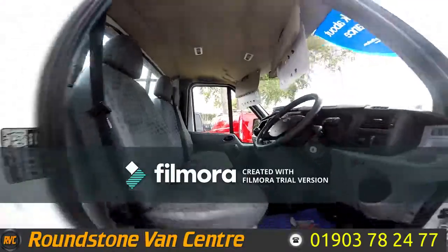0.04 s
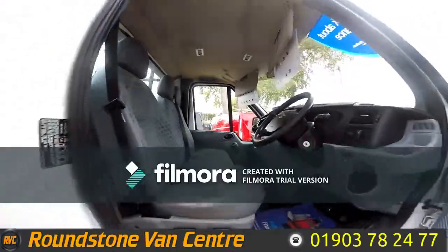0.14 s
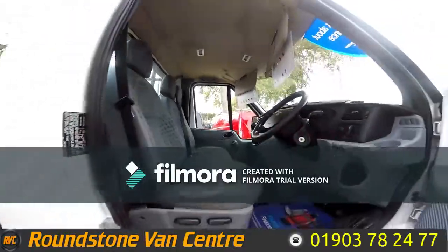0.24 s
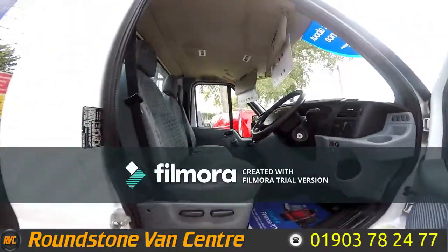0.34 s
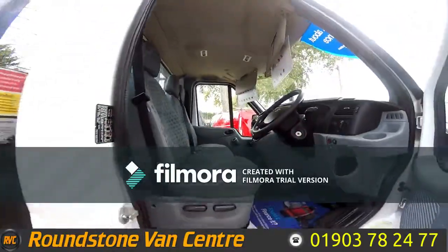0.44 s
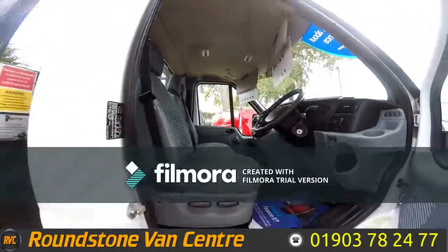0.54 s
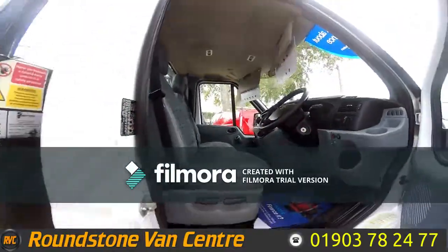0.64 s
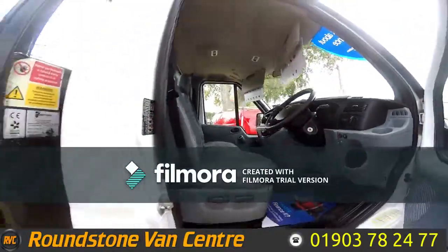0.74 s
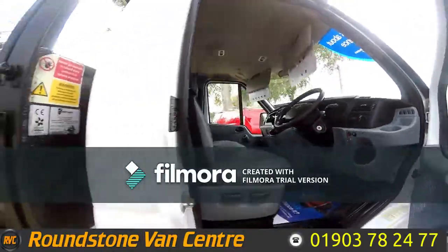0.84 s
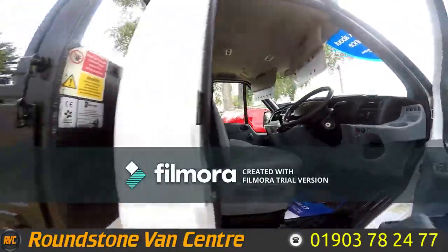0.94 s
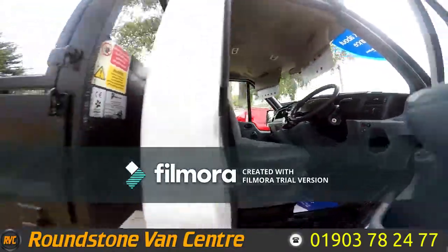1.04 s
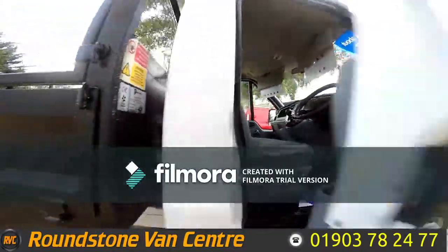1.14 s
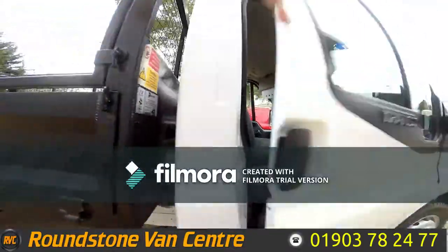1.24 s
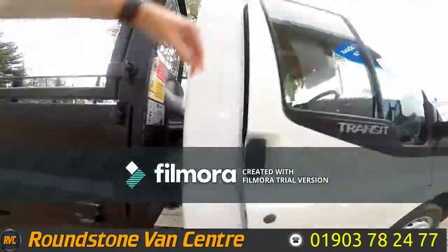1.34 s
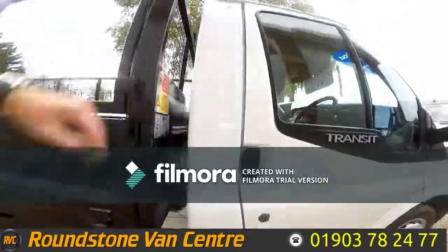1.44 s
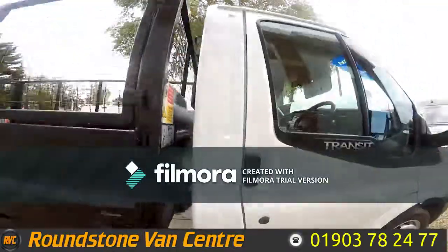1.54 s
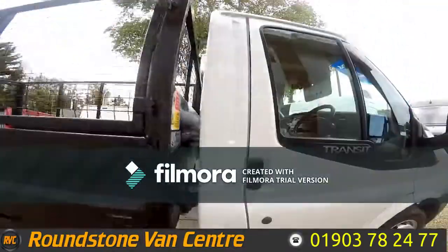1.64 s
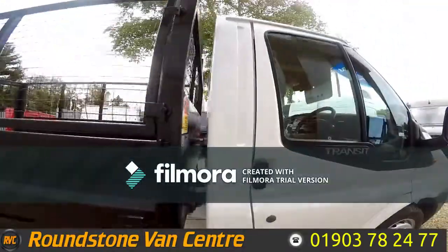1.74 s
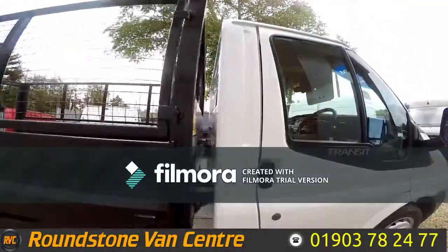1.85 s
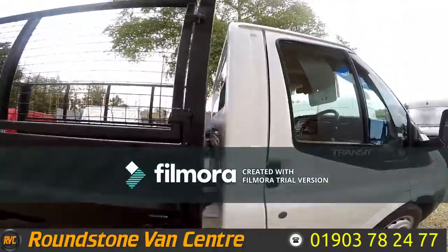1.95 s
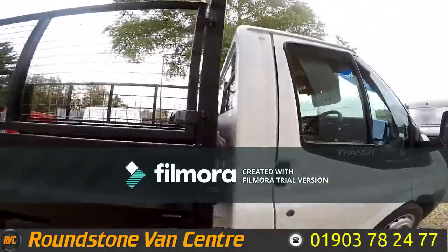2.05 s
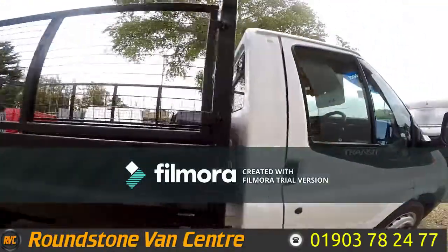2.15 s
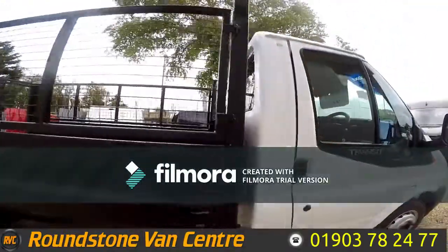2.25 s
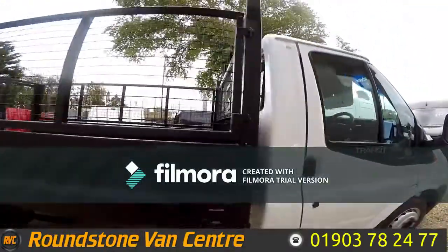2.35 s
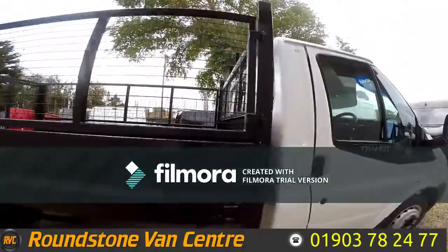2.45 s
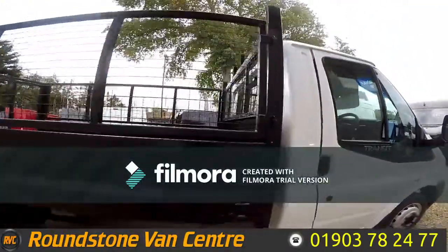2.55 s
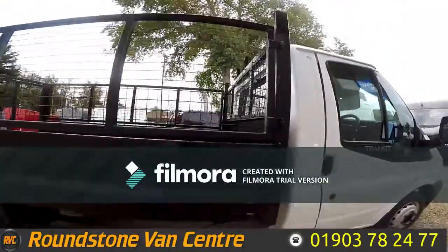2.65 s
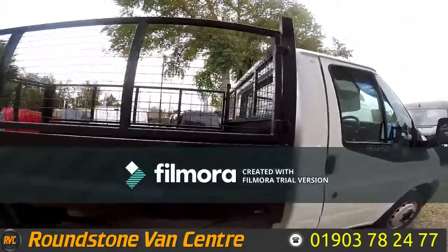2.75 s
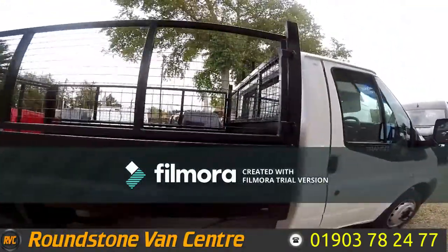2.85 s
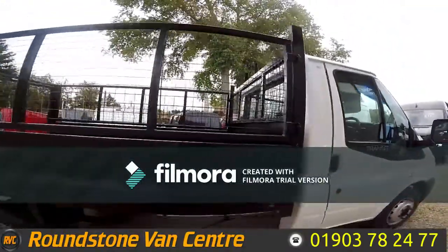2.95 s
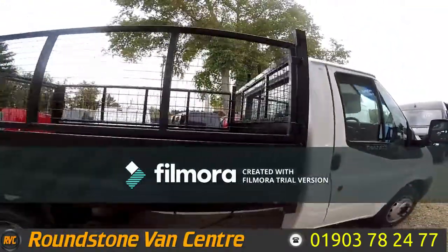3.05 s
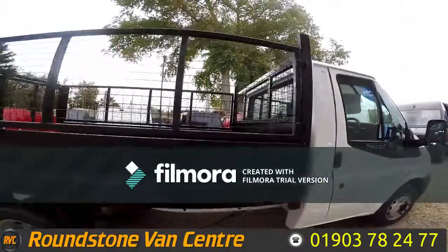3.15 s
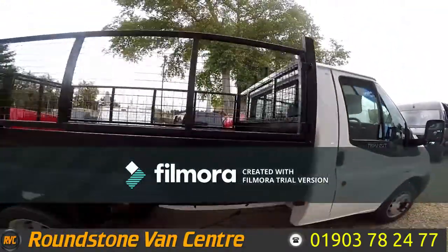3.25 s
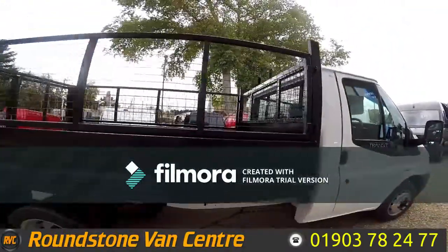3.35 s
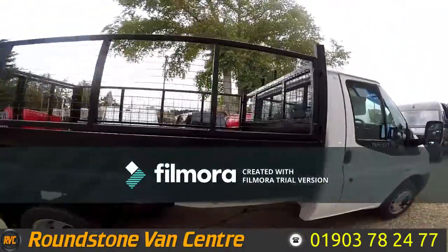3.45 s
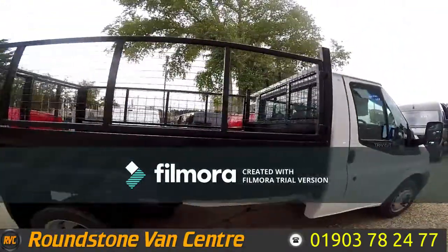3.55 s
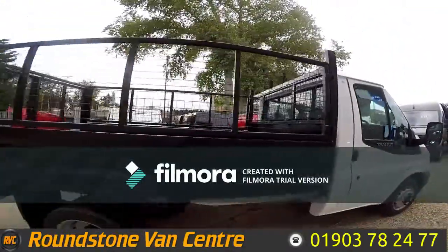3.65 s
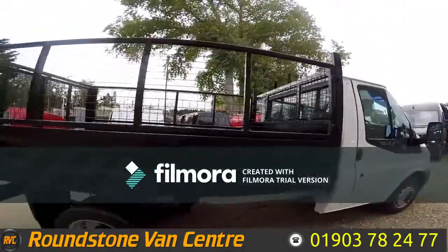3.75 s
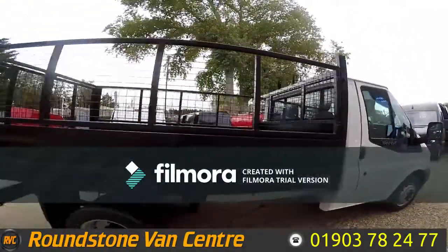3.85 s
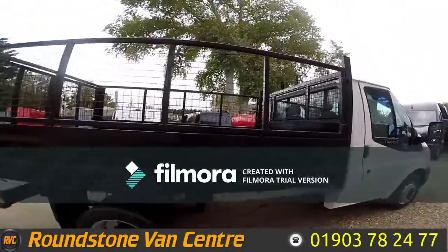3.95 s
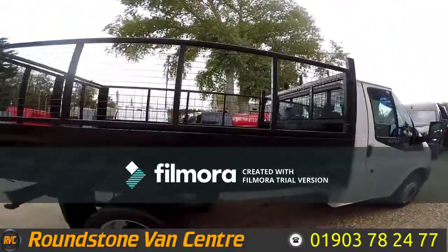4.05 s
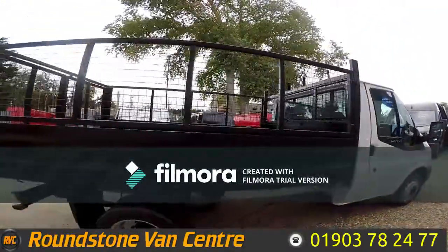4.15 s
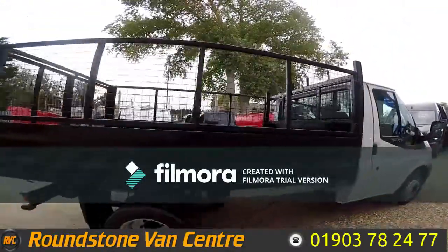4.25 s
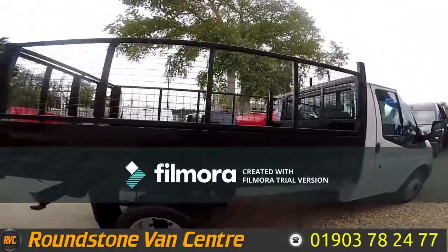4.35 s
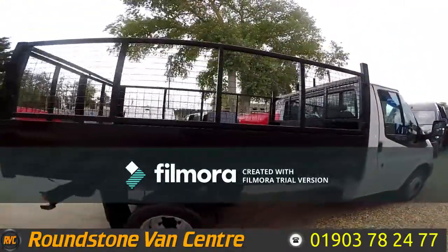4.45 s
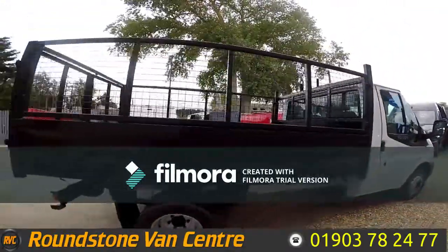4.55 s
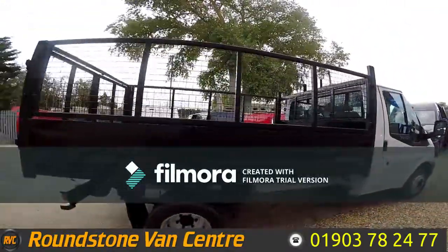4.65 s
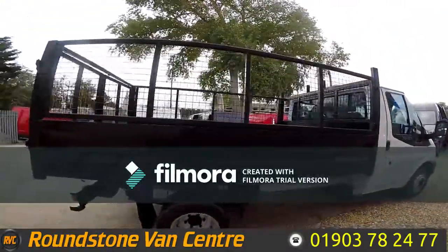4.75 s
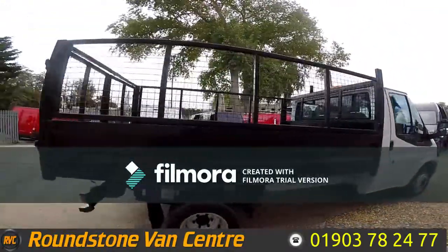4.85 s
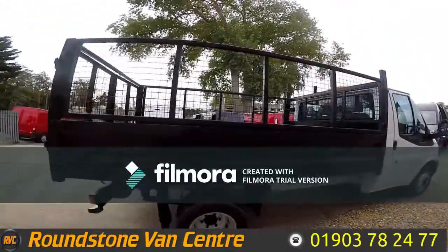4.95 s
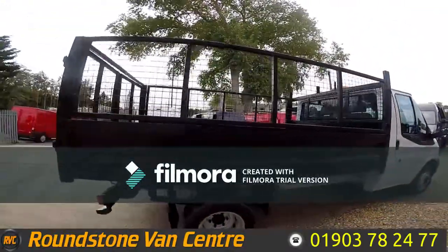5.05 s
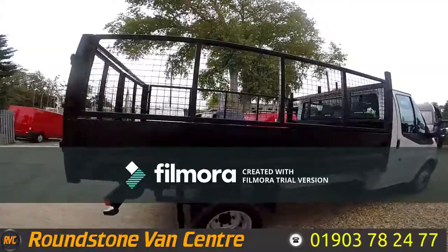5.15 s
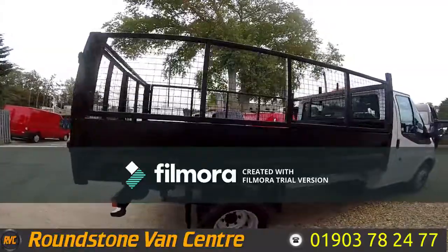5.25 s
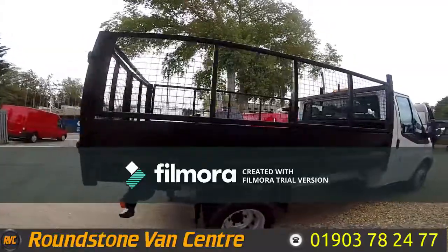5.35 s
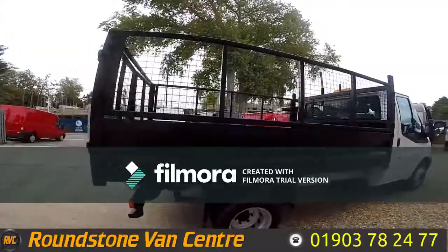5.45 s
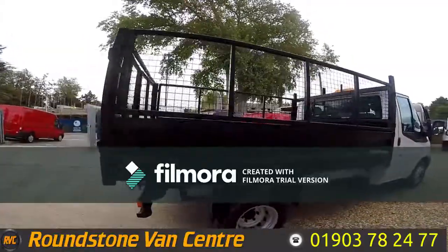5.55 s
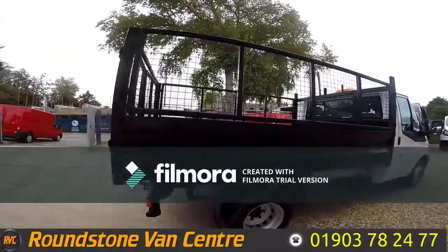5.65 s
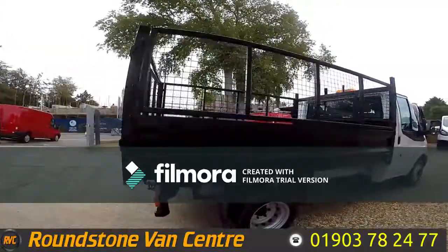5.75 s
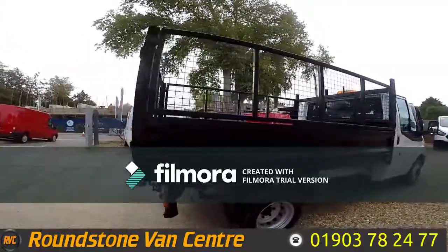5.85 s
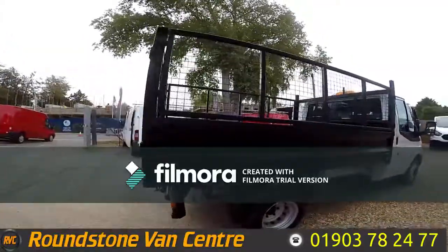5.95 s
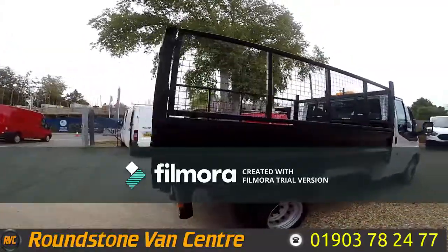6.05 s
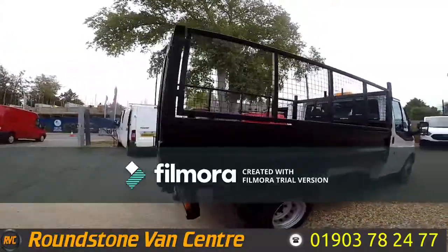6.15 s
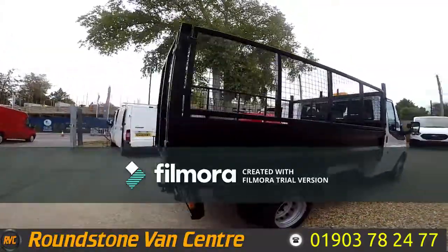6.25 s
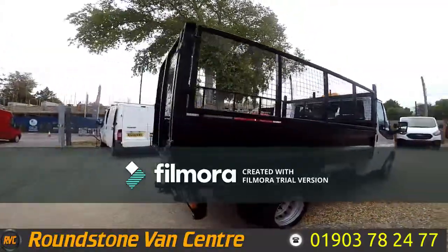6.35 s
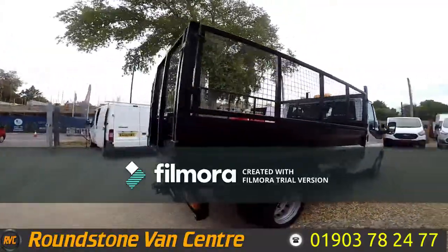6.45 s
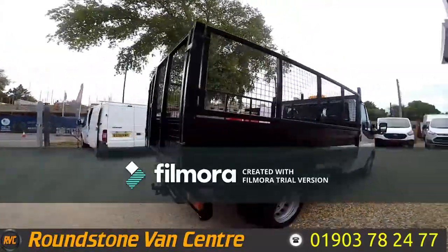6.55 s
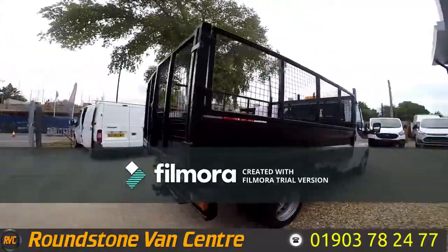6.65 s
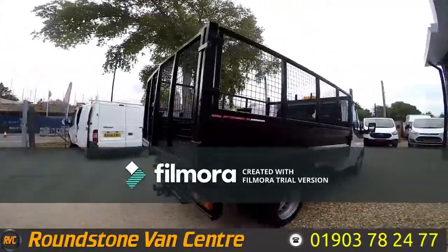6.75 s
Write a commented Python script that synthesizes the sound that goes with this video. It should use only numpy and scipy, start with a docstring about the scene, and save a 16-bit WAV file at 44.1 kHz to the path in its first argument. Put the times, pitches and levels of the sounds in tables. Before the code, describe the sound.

A low rumble of distant traffic with faint tyre roar runs throughout, heard outdoors on a hand-held microphone. In the first second, shoes scuff lightly on gravel and pebbles click, with a few dull knocks around 1 second. At about 1.4 seconds a van door slams close by, the loudest sound: the latch snaps, the steel panels shudder and the cab gives a deep boom that dies within a second. The overall level ducks after the slam and creeps back. From about 2.2 seconds footsteps move on over the gravel, with uneven scrapes, dull crunches, sharp pebble snaps and occasional small knocks, continuing to the end. From about 3 seconds a passing engine adds a low, wavering drone that climbs in pitch until 6 seconds, then sinks, still sounding at the end near 7 seconds.

```python
"""Distant traffic rumbles under footsteps on a gravel yard. A van's cab door slams close by: the latch
snaps, the steel panels shudder and the air trapped in the cab booms. The hand-held camera's gain
control ducks on the slam and creeps back. The person holding it walks on, shoes grinding the stones
and snapping single pebbles, while one engine pulls past, its exhaust drone climbing, then sinking."""
import sys
import numpy as np
from scipy import signal
from scipy.fft import rfft, irfft, next_fast_len
from scipy.io import wavfile
from scipy.ndimage import uniform_filter1d, minimum_filter1d, map_coordinates

SR = 44100
rng = np.random.default_rng(int(sys.argv[2]) if len(sys.argv) > 2 else 0)


def store_wav(level_fs):
    """Save 16-bit WAV to argv[1]."""
    pcm = np.round(np.clip(np.atleast_2d(level_fs), -1, 1) * 32767)
    wavfile.write(sys.argv[1], SR, pcm.T.astype(np.int16))


N = 299880

# The traffic bed. Each row: time in seconds, rumble level in dB, tyre roar level in dB.
TRAFFIC_LEVELS = [(0, -25, -38.5), (.6, -24.5, -39.5), (1.2, -22.5, -37), (2.2, -22.5, -38),
                  (2.7, -24.5, -37.5), (4.5, -25, -37.5), (5.4, -21.5, -36.5), (5.7, -18, -36),
                  (6.1, -21, -34.5), (6.8, -20.5, -35)]
# Tone of the bed's three layers. Each row: frequency in Hz, relative level in dB.
RUMBLE_EQ = [(10, -11), (25, 1), (45, 1.5), (70, -4.5), (110, -8), (160, -11.5), (230, -17.5), (400, -32.5),
             (900, -74.5)]
ROAR_EQ = [(120, -3), (250, -2), (420, 4.5), (700, -6), (1200, -6.5), (1700, -17.5), (2600, -21),
           (5000, -25), (10000, -51)]
HISS_EQ = [(800, -21), (2500, -1), (7100, 4), (7700, -2.5), (10500, -8), (11500, -14.5), (15000, -38)]

# Shoes sliding on gravel. Each row: start in seconds, level in dB, push and settling t60 in seconds.
SCUFFS = [(0.152, -43, 0.27, 0.1), (0.517, -39, 0.044, 0.2), (0.742, -47.5, 0.028, 0.22),
          (1.05, -47, 0.13, .4), (1.216, -27, 0.039, 0.23), (2.247, -35.5, 0.045, 0.56),
          (2.544, -38, 0.054, 0.62), (2.957, -39.5, .13, 0.99), (3.242, -39.5, 0.18, 1),
          (3.638, -35.5, 0.076, 1), (3.842, -35.5, 0.06, 1), (4.2, -45.5, .33, .9),
          (4.923, -36, 0.031, 0.34), (5.032, -40, 0.042, 0.42), (5.12, -43.5, 0.18, 1),
          (5.517, -33, 0.037, 0.51), (6.06, -45, 0.073, 0.43), (6.155, -39, 0.015, 0.99),
          (6.47, -41, .03, .3), (6.762, -35, .05, .4)]
# Single pebbles snapping. Each row: start in seconds, level in dB.
PEBBLE_SNAPS = [(0.235, -28.5), (0.2986, -31.5), (0.3316, -26.5), (0.362, -29), (0.384, -32), (0.482, -31),
                (0.694, -34), (1.225, -18.5), (1.312, -35), (2.603, -32), (3.3594, -25), (3.44, -32),
                (4.0606, -24), (4.1602, -27), (4.225, -29), (4.2472, -30.5), (4.264, -31), (4.35, -31),
                (5.1556, -23.5), (5.2562, -28.5), (5.274, -30), (5.3, -28.5), (6.492, -30)]
# Shoes pressing down. Each row: peak time in seconds, level in dB, half-width in seconds.
CRUNCHES = [(1.237, -32.5, 0.04), (3.077, -35, 0.11), (3.733, -27.5, 0.084), (3.943, -40.5, 0.12),
            (4.464, -36, 0.13), (5.03, -32, 0.13), (5.614, -30.5, 0.11), (6.21, -35, 0.18),
            (6.788, -33.5, .08)]
# Tone of the gravel sounds. Each row: frequency in Hz, relative level in dB.
SPRAY_EQ = [(800, -9), (2500, -10), (3800, -1.5), (6800, 3.5), (8800, -3), (10000, -11), (11200, -17.5),
            (12800, -15), (15000, -31)]
PEBBLE_EQ = [(1500, -5.5), (3000, -2.5), (4200, -1.5), (6800, 6.5), (8800, -2), (10500, -21), (13000, -14),
             (15200, -31)]
CRUNCH_EQ = [(80, -41), (280, 8), (600, -2.5), (1300, -6.5), (2500, -17), (6000, -18), (12000, -55)]

# Small knocks. Each row: start in seconds, level in dB, thud and tick in dB against that level.
KNOCK_HITS = [(0.966, -27.5, 10, -6.5), (1.026, -26, 11.5, -9.5), (1.172, -27, 6, -12),
              (2.49, -27.5, 2, -7), (2.853, -25.5, -23, -16.5), (2.95, -30, -15, -21), (3.166, -33, 3, -8),
              (3.699, -28, 8.5, -12), (3.844, -31, 8.5, -1), (5.434, -25.5, -10, -32)]
# Tone of a knock's middle, bottom and top. Each row: frequency in Hz, relative level in dB.
KNOCK_EQ = [(300, -12), (700, 1), (1050, 8.5), (1350, 1), (1700, -3), (2500, -16.5), (6000, -35),
            (12000, -60)]
THUD_EQ = [(60, -14), (150, 3), (230, -3.5), (500, -16.5), (1500, -52), (4000, -90)]
TICK_EQ = [(1000, -5), (2300, 1), (3800, -3), (8000, -26), (12000, -50)]
# The yard's reverb time. Each row: frequency in Hz, t60 in seconds.
YARD_DECAY = [(100, 1), (1000, 0.22), (8000, 0.2)]

# The door hits seal, latch and frame, then glass and trim shake.
# Each row: start in seconds, crack level in dB, panel level in dB.
DOOR_CONTACTS = [(1.375, -25, -17.5), (1.3844, -6.5, -5.5), (1.3918, -19, -0.5), (1.3999, -34, 0),
                 (1.412, -17, -6), (1.435, -16, -5), (1.449, -19, -6), (1.474, -23, -6.5),
                 (1.509, -16.5, -0.5), (1.524, -31, -8), (1.546, -31, -11.5), (1.575, -22, -11),
                 (1.608, -32, -22), (1.645, -50, -24.5), (1.72, -38, -32), (1.756, -70, -27.5)]
# Tone of a contact's crack and shudder. Each row: frequency in Hz, relative level in dB.
CRACK_EQ = [(400, -31), (1200, 17), (2100, -3.5), (2800, -0.5), (3800, 3), (4600, -6), (5900, 0),
            (7500, -10), (9200, -7), (10200, -45), (15000, -39)]
PANEL_EQ = [(50, 0), (110, -1.5), (190, 0.5), (300, -3), (500, -13), (680, -13), (1300, -22.5), (2000, -25),
            (3000, -35.5), (7000, -35), (14000, -65)]
# Damping of the shudder, on top of its overall fade. Each row: frequency in Hz, t60 in seconds.
PANEL_DAMPING = [(100, 0.19), (400, 0.19), (1200, 0.16), (5000, 0.25)]
# Resonances of the door skin, the cab's air and rocking body, and the latch steel.
# Each row: frequency in Hz, level in dB, t60 in seconds.
SKIN_MODES = [(140.7, -5.5, 0.55), (181.4, -7, 0.4), (220, -1.5, 0.34), (480, -0.5, 0.11),
              (542, -10.5, 0.22), (781, -20, 0.17), (954, -17.5, 0.2), (1100, -11, 0.048),
              (1344, -16, 0.21), (1510, -19, 0.11), (1704, -14, 0.089)]
CAB_MODES = [(17, -9, 1.36), (32.77, -4, 1.74), (51.8, -5.5, 1.6), (98.4, -15.5, 1.7)]
LATCH_MODES = [(1775, -1, 0.07), (2040, -2, 0.091), (3400, -24, 0.061), (3440, -14, 0.065),
               (3780, 1, 0.046), (5800, -2, 0.028), (6200, -15, .04), (9070, -26, 0.14), (9120, -15, 0.18)]
# The latch's two notches engage. Each row: start in seconds, level in dB.
LATCH_NOTCHES = [(1.3828, -16.5), (1.394, -13)]

# The passing engine's revs. Each row: time in seconds, firing rate in Hz.
ENGINE_PITCH = [(2.9, 80), (3.55, 82.6), (4.0, 90), (4.25, 91), (4.75, 107), (5.08, 113), (5.49, 131),
                (6.05, 145.5), (6.6, 125), (6.8, 123)]
# Its drone, and its uneven firing at half the rate. Each row: time in seconds, level in dB.
DRONE_LEVEL = [(2.9, -34), (3.25, -30.5), (4.0, -21), (4.3, -27.5), (4.72, -22.5), (5.1, -37), (5.48, -26),
               (5.85, -36.5), (6.05, -15), (6.2, -29), (6.55, -24.5), (6.8, -11.5)]
UNEVEN_LEVEL = [(2.9, -31.5), (4.2, -24.5), (4.7, -27.5), (5.5, -23), (6.0, -27.5), (6.8, -32)]


def amp(db):
    """Decibels to gain."""
    return 10 ** (np.asarray(db) / 20)


def unit(x):
    """Scale to rms 1."""
    return x / np.sqrt(np.mean(x ** 2) + 1e-20)


def along(points, hz):
    """Read (Hz, value) points on a log axis."""
    f, v = np.transpose(points)
    return np.interp(np.log(hz + 1), np.log(f + 1), v)


def curves(rows):
    """One automation curve for each column after the time."""
    times, *columns = np.transpose(rows)
    return [np.interp(np.arange(N) / SR, times, column) for column in columns]


def wobble(rate):
    """A smooth random curve, rate knots a second."""
    return map_coordinates(rng.standard_normal(int(N * rate / SR) + 4), [np.arange(N) * rate / SR])


def coloured(x, eq):
    """x through an EQ curve, at rms 1."""
    size = next_fast_len(len(x))
    gain = amp(along(eq, np.fft.rfftfreq(size, 1 / SR)))
    return unit(irfft(rfft(x, size) * gain, size)[:len(x)])


def noise(eq, size):
    """Coloured noise of rms 1."""
    return coloured(rng.standard_normal(size), eq)


def clicks(per_s):
    """Impulses of random size at random times."""
    return rng.standard_normal(N) * (rng.random(N) < per_s / SR)


def fade(t60, attack):
    """One second of a struck envelope; t60 is the seconds it takes to fall 60 dB."""
    t = np.arange(SR) / SR
    return np.exp(-np.log(1000) * t / t60) * (1 - np.exp(-t / attack))


def damped(x, decays):
    """Each frequency of x dies at its own speed."""
    hz, t, bands = signal.stft(x, SR, nperseg=256)
    decay = np.exp(-np.log(1000) * t / along(decays, hz)[:, None])
    return signal.istft(bands * decay, SR, nperseg=256)[1][:len(x)]


def ring(modes, attack):
    """Damped modes, struck at new strengths each time."""
    t = np.arange(SR) / SR
    scatter_db = 2 * rng.standard_normal(len(modes))
    return sum(amp(db + offset_db) * np.sin(2 * np.pi * hz * t) * fade(t60, attack)
               for offset_db, (hz, db, t60) in zip(scatter_db, modes))


def add(track, start, sound):
    """Mix a sound into the track at start seconds."""
    part = track[round(start * SR):][:len(sound)]
    part += sound[:len(part)]


def traffic():
    """Low rumble and tyre roar from the road, over a faint even hiss."""
    rumble_db, roar_db = curves(TRAFFIC_LEVELS)
    drift_db = 0.7 * wobble(5)
    rumble = amp(rumble_db + 0.81 * wobble(7)) * noise(RUMBLE_EQ, N)
    roar = amp(roar_db + drift_db) * noise(ROAR_EQ, N)
    return rumble + roar + amp(-50.5) * noise(HISS_EQ, N)


def scuff_envelope(start, push, t60):
    """Rises as the shoe takes the weight, holds while it pushes, dies as the stones settle."""
    t = np.maximum(np.arange(N) / SR - start, 0)
    attack = 1 - np.exp(-t / 0.004)
    return attack * np.exp(-np.log(1000) * np.maximum(t - push, 0) / t60)


def gravel_scuffs():
    """Sliding shoes rub stones into a bright spray of clicks; a few slip with a tick."""
    sliding = sum(amp(db) * scuff_envelope(start, push, t60) for start, db, push, t60 in SCUFFS)
    clumps = amp(2.5 * wobble(70))
    spray = amp(-1.5) * coloured(clicks(per_s=3000) * clumps, SPRAY_EQ)
    ticks = amp(-17.5) * coloured(clicks(per_s=91), PEBBLE_EQ)
    return sliding * (spray + ticks)


def pebble_snaps():
    """Stone snaps against stone: each a dry crack and a brief ring at its own pitches."""
    out = np.zeros(N)
    for start, db in PEBBLE_SNAPS:
        pitches_hz = 6580 * np.exp(0.25 * rng.uniform(-1.02, 1, size=3))
        crack = noise(PEBBLE_EQ, SR) * fade(t60=0.029, attack=0.00033)
        ping = ring([(hz, -8, 0.016) for hz in pitches_hz], attack=0.0004)
        add(out, start, amp(db) * (crack + ping))
    return out


def knocks():
    """Dull knocks of the van and of stones underfoot, each with a thud below and a tick above."""
    out = np.zeros(N)
    for start, db, thud_db, tick_db in KNOCK_HITS:
        knock = noise(KNOCK_EQ, SR) * fade(t60=0.057, attack=0.00066)
        thud = noise(THUD_EQ, SR) * fade(t60=0.23, attack=0.0074)
        tick = noise(TICK_EQ, SR) * fade(t60=0.075, attack=0.0005)
        add(out, start, amp(db) * (knock + amp(thud_db) * thud + amp(tick_db) * tick))
    return out


def yard_reverb(x):
    """Parked vans and fences scatter a short tail back."""
    build_up = 1 - np.exp(-np.arange(SR) / SR / 0.02)
    tail = damped(rng.standard_normal(SR), YARD_DECAY) * build_up
    return signal.fftconvolve(x, tail / np.linalg.norm(tail))[:N]


def gravel_crunch():
    """A dull, grainy crunch swells as the walker's weight presses into the stones."""
    t = np.arange(N) / SR
    weight = sum(amp(db) * np.exp(-2 * ((t - peak) / width) ** 2) for peak, db, width in CRUNCHES)
    grind = amp(1.5 * wobble(90))
    return weight * unit(noise(CRUNCH_EQ, N) * grind)


def door_slam():
    """Each contact cracks and shakes the steel panels."""
    out = np.zeros(N)
    for start, crack_db, panel_db in DOOR_CONTACTS:
        snap_and_tail = fade(t60=0.023, attack=0.00027) + amp(-8.5) * fade(t60=0.14, attack=0.0011)
        crack = noise(CRACK_EQ, SR) * snap_and_tail
        # the panel's countless close modes blur into noise; a few stand out and ring
        shudder = damped(noise(PANEL_EQ, SR), PANEL_DAMPING) * fade(t60=0.91, attack=0.0023)
        skin = amp(-8.5) * ring(SKIN_MODES, attack=0.00089)
        add(out, start, amp(crack_db) * crack + amp(panel_db) * (shudder + skin))
    return out


def cab_boom():
    """The slam's low end: the door seals, the trapped air booms and the body rocks."""
    out = np.zeros(N)
    add(out, start=1.381, sound=ring(CAB_MODES, attack=0.009))
    return out


def latch():
    """The steel latch rings brightly as each notch catches."""
    out = np.zeros(N)
    for start, db in LATCH_NOTCHES:
        add(out, start, amp(db) * ring(LATCH_MODES, attack=0.00067))
    return out


def engine():
    """An exhaust drone climbs as a vehicle pulls away, then sinks; uneven cylinders add half orders."""
    hz, drone_db, uneven_db = curves(ENGINE_PITCH) + curves(DRONE_LEVEL) + curves(UNEVEN_LEVEL)
    phase = 2 * np.pi * np.cumsum(hz * (1 + 0.0085 * wobble(18))) / SR
    drone = amp(drone_db + 1.84 * wobble(14)) * (np.sin(phase) + amp(-21) * np.sin(2 * phase))
    uneven = amp(uneven_db + 2.1 * wobble(9)) * (np.sin(phase / 2) + amp(-13) * np.sin(3 * phase / 2))
    t = np.arange(N) / SR
    gate = (t >= ENGINE_PITCH[0][0]) & (t <= ENGINE_PITCH[-1][0])
    return np.sqrt(2) * (drone + uneven) * gate


def scene():
    """Door, footsteps and road in mono; only the slam and knocks feed the reverb."""
    hits = door_slam() + latch() + cab_boom() + knocks()
    reverb = amp(-16) * yard_reverb(hits)
    footsteps = gravel_scuffs() + gravel_crunch() + pebble_snaps()
    return (hits + reverb + footsteps + engine() + traffic())[None]


def gain_control(x, threshold_db, hold_s, recovery_db_per_s):
    """Gain ducks at once on a loud sound, stays down a moment and recovers at a steady rate."""
    level_db = 10 * np.log10(np.abs(uniform_filter1d(x ** 2, size=1100)) + 1e-12)
    over_db = np.maximum(level_db - threshold_db, 0)
    half_hold = int(hold_s * SR / 2)
    held_db = -minimum_filter1d(-over_db, 2 * half_hold + 1, origin=half_hold, mode="constant")
    recovery_db = recovery_db_per_s * np.arange(N) / SR
    cut_db = np.maximum.accumulate(held_db + recovery_db, axis=-1) - recovery_db
    return x * amp(-cut_db)


def record(dry):
    """The camera rides its gain, rounds off the peaks and cuts the highest treble."""
    ducked = gain_control(dry, threshold_db=-8.0, hold_s=0.61, recovery_db_per_s=14.5)
    rounded = ducked / (1 + np.abs(ducked / 0.95) ** 6) ** (1 / 6)
    size = next_fast_len(N + SR // 2)
    passband = np.fft.rfftfreq(size, 1 / SR) < 15300  # Hz
    return irfft(rfft(rounded, size) * passband, size)[..., :N]


dry = scene()
out = record(dry)
store_wav(out)
```